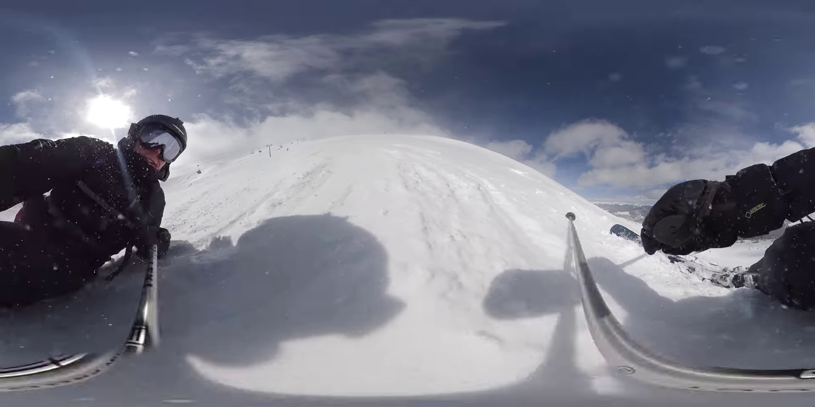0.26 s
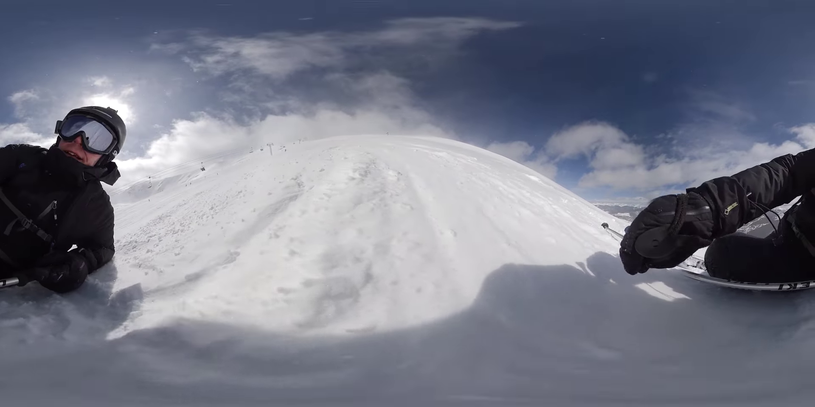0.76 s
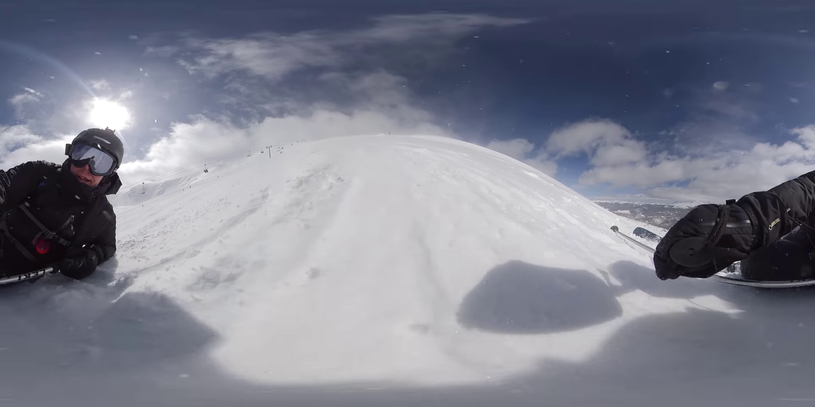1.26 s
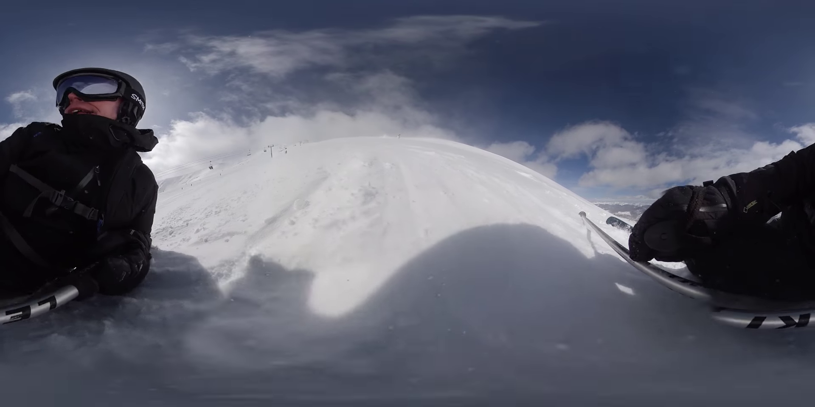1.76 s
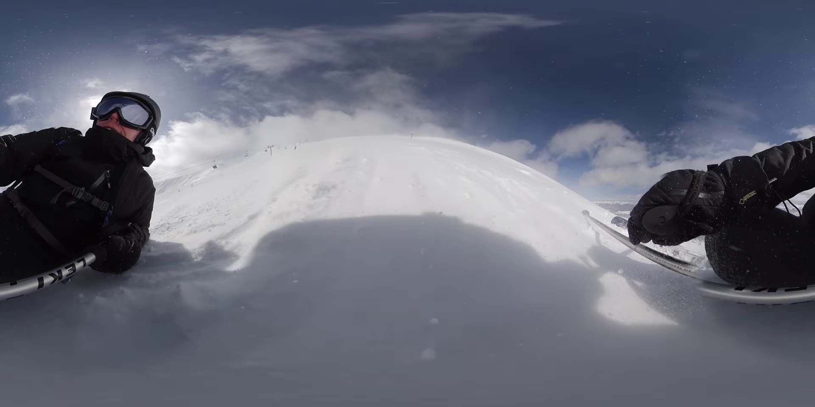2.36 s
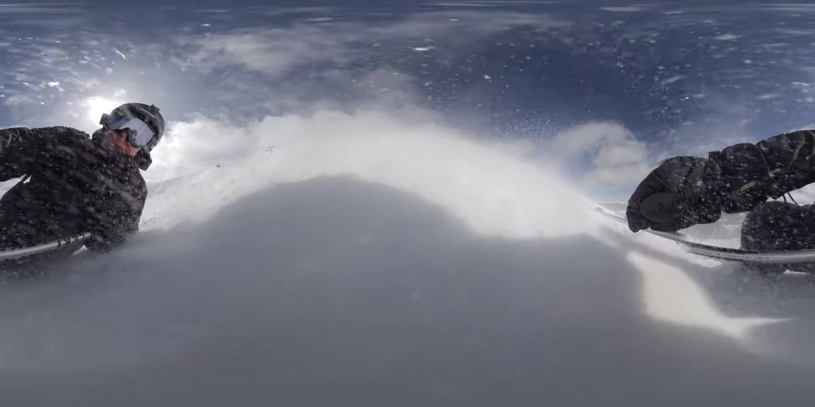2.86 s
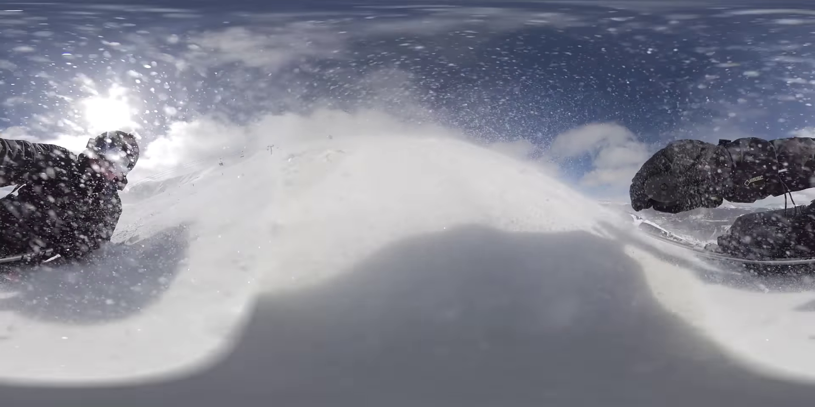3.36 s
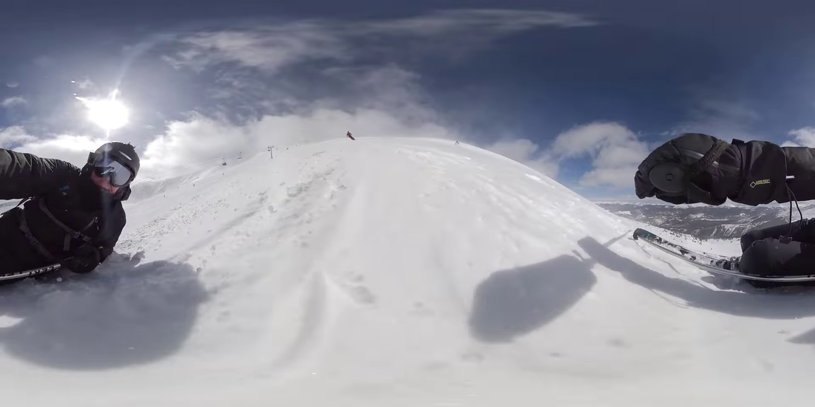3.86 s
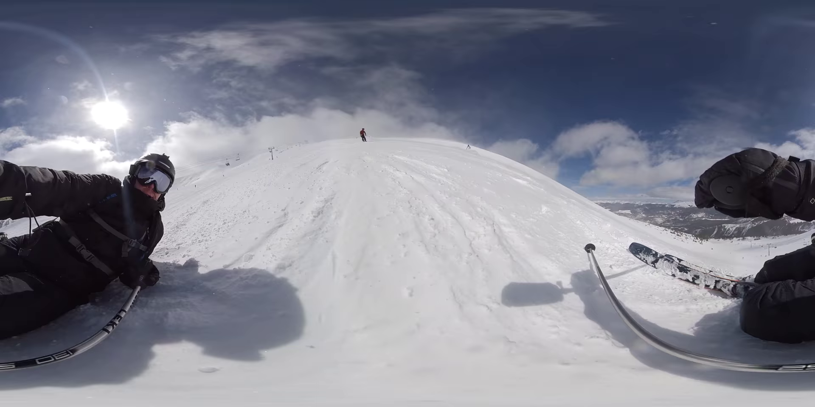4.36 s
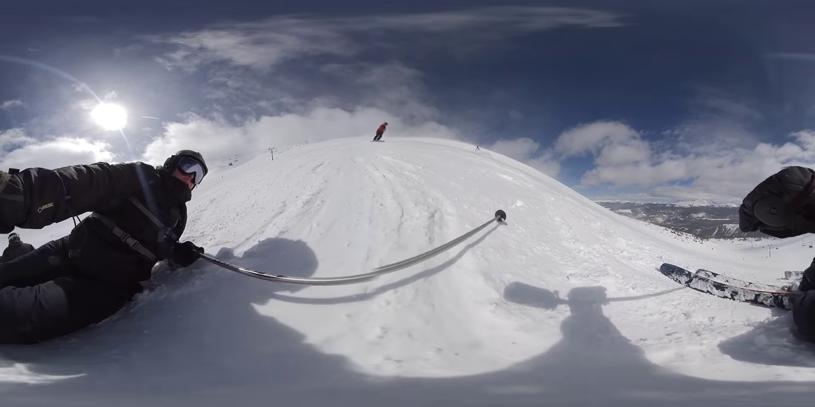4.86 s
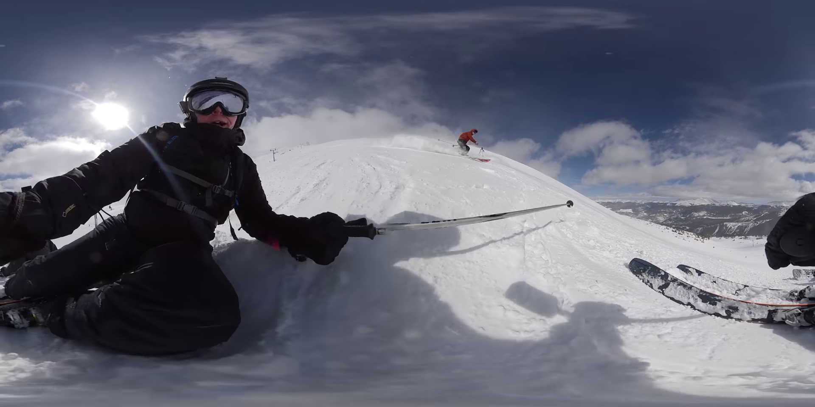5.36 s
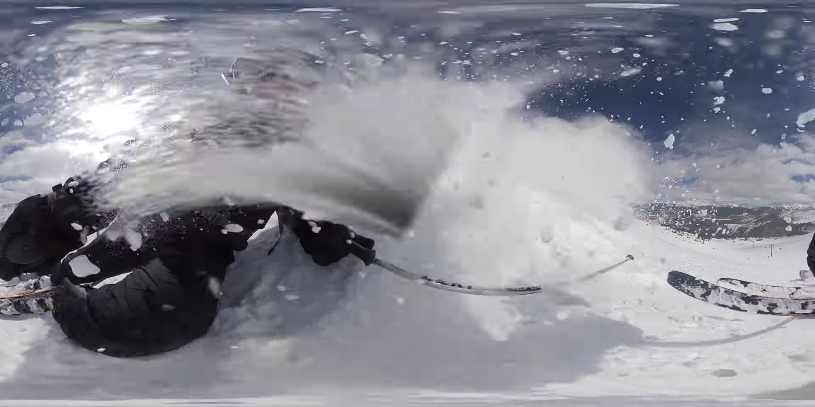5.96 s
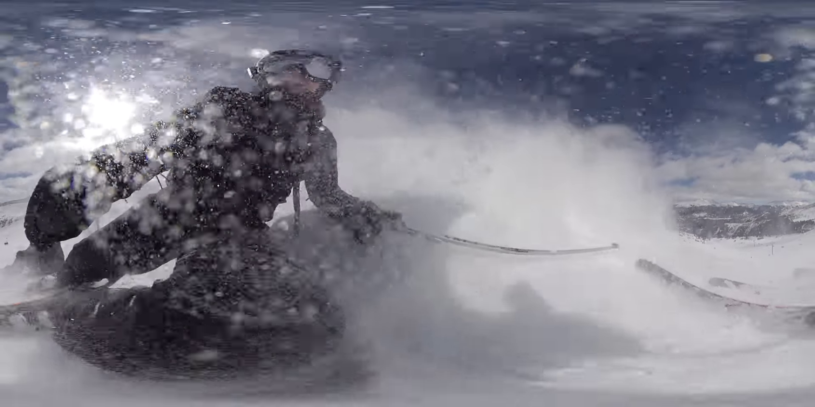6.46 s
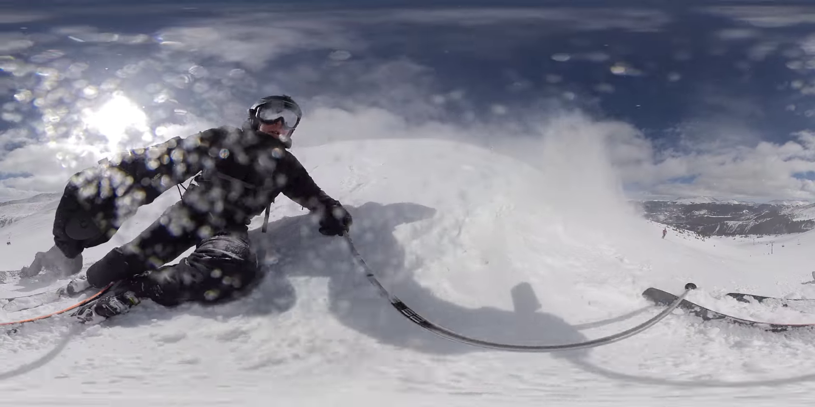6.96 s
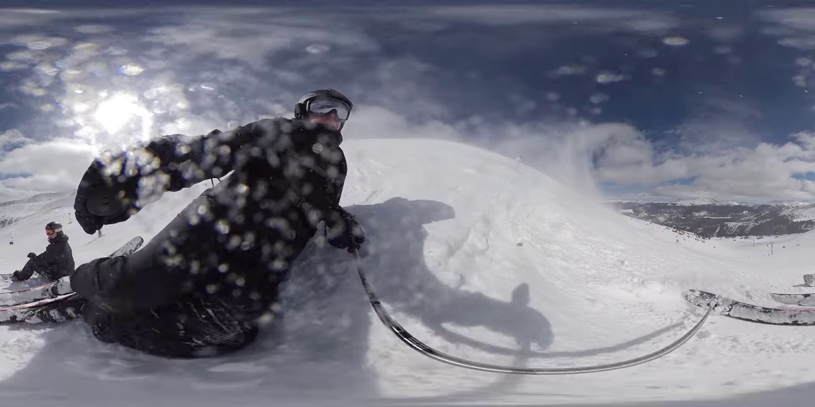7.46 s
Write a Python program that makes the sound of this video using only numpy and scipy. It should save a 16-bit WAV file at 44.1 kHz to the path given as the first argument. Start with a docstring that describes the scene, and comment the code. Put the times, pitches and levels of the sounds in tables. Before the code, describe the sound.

On an open slope without echo, a microphone held low on a pole picks up the soft hiss of skis and light wind. Sharp taps and brief rubs come from the mount. Toward the middle, spraying snow swells loudly and clumps crunch against the housing. After a quiet stretch of gliding, more hard knocks land, followed by a short spatter of powder and a few last taps.

```python
"""A faint hiss of skis gliding in deep powder, heard from a camera held low on a pole, close to the snow.
A little wind rumbles on the two microphone ports. As the skier carves, spray rushes past and pelts
the housing, and clumps of snow burst on it and make the ports hoot. The mount rubs and knocks as the
pole swings, and late in the run the pole hums briefly. Open slope, no echo."""
import sys
import numpy as np
from scipy import signal
from scipy.fft import rfft, irfft, next_fast_len
from scipy.io import wavfile
from scipy.ndimage import uniform_filter1d, minimum_filter1d

SR = 44100
rng = np.random.default_rng(int(sys.argv[2]) if len(sys.argv) > 2 else 0)


def store_pcm(level_fs):
    """Save levels as 16-bit WAV."""
    pcm = np.round(np.clip(level_fs, -1, 1) * 32767).astype(np.int16)
    wavfile.write(sys.argv[1], SR, np.atleast_2d(pcm).T)


N = 339614
CUTOFF_HZ = 9900  # top of the microphones' range
CAVITY_HZ, CAVITY_WIDTH_HZ = 1074, 190  # hollow behind each port
POLE_HZ = 137.4

# Levels in the tables are relative: each source adds its own gain.
# rush of spray along the run: t/s, middle level/dB, treble level/dB
SPRAY_LEVELS = [(0.0, -52.5, -47.5), (0.3, -53.5, -52.5), (0.71, -52, -54.5), (1.03, -49, -54.5),
                (1.48, -45.5, -41.5), (1.67, -39, -45.5), (2.04, -52, -49), (2.32, -42, -43.5),
                (2.68, -26.5, -26), (2.96, -32.5, -25), (3.43, -29.5, -29.5), (3.71, -50.5, -47),
                (3.86, -60.5, -60.5), (4.44, -53, -60), (4.95, -62, -60.5), (5.47, -47, -49),
                (5.62, -39.5, -51), (5.98, -46.5, -55.5), (6.22, -42.5, -45), (6.52, -56, -55),
                (6.8, -57, -61.5), (7.06, -65.5, -58.5), (7.25, -45, -53.5), (7.7, -50, -52.5)]
# showers of loose powder that reach the camera: t/s, level/dB, hold/s
POWDER_SHOWERS = [(0.0, -44, 0.0075), (.71, -46, 0.021), (2.07, -45.5, 0.0082), (2.39, -31, 0.0067),
                  (2.51, -23, 0.12), (2.745, -20.5, 0.024), (2.935, -22, 0.13), (3.5, -26.5, 0.059),
                  (6.26, -31.5, 0.039), (6.38, -41, 0.036), (7.57, -46, 0.041)]
# ski edges scraping on firmer snow: t/s, level/dB, hold/s
EDGE_SCRAPES = [(.53, -34, .05), (4.58, -46, .09), (5.45, -41, .11), (7.07, -39, .11)]
# spray as heard at the ports: f/Hz, left level/dB, right level/dB
SPRAY_SPECTRUM = [(150, -32.5, -17), (414, -15.5, -28), (781, -8.5, 3.5), (1060, -10.5, 9), (1310, -3, 0),
                  (1440, -11, 6), (1950, -4, -2), (2127, -6, 6), (2840, -9.5, 1), (3290, -18.5, -3),
                  (4710, -15.5, -11.5), (5790, -21.5, -18.5), (7570, -22.5, -9.5), (10400, -23.5, -18.5)]
# how hard the skis press the powder down: t/s, level/dB
SKI_PRESSURE = [(0.0, -71.5), (0.73, -52.5), (1.03, -63.5), (1.67, -55.5), (2.12, -62), (2.81, -54.5),
                (3.39, -59), (3.62, -61.5), (5.0, -61), (5.68, -52), (6.69, -67), (7.7, -57.5)]
# powder giving way under the skis: f/Hz, level/dB
GLIDE_SPECTRUM = [(50, -21.5), (140, -11), (260, -5.5), (450, -4.5), (700, 1), (1050, 1), (1500, -9.5),
                  (2400, -20), (4000, -41.5), (9000, -39.5)]
# air flow over the ports: t/s, level/dB
AIR_FLOW = [(0.0, -68), (0.41, -60.5), (0.62, -51), (1.14, -65), (1.74, -47.5), (2.06, -61.5),
            (2.42, -47.5), (4.14, -67), (6.69, -80), (7.7, -67)]
# rumble of that flow: f/Hz, level/dB
WIND_SPECTRUM = [(20, -6), (52, 6.5), (80, 4), (140, -4), (250, -10), (450, -16), (900, -32), (2500, -62)]
# low thuds of hard knocks on the housing, with softer puffs of wind: t/s, level/dB, hold/s
THUDS_AND_PUFFS = [(.135, -48, 0.011), (.56, -43, 0.094), (.66, -33, 0.0063), (.742, -33, 0.027),
                   (1.661, -20, 0.0075), (1.71, -48, 0.048), (4.405, -48, .01), (5.295, -48, 0.014),
                   (5.46, -47.5, .015), (5.76, -50, .02), (6.016, -24, 0.0023), (6.097, -29.5, .003),
                   (6.97, -48, 0.021), (7.285, -48.5, 0.035), (7.655, -52, .01)]
# dull tone of a thud or puff: f/Hz, level/dB
THUD_SPECTRUM = [(25, 8.0), (60, 0.0), (160, 1.5), (350, -5.0), (700, -10.0), (2000, -29.0)]
# the mount rubbing as the pole swings: t/s, level/dB, hold/s
MOUNT_RUBS = [(.593, -24, .002), (.605, -17.5, 0.0067), (1.326, -21.5, .002), (1.339, -16.5, .011),
              (1.366, -23, 0.0067), (1.728, -14, 0.0054), (5.634, -14.5, 0.0049), (5.659, -19.5, 0.0029),
              (7.098, -14.5, 0.0065)]
# the housing rung by a rub: f/Hz, left level/dB, right level/dB
RUB_SPECTRUM = [(147, -61, -49), (393, -25.5, -51), (703, -8.5, -6.5), (1018, -3, 6), (1296, -5.5, -15),
                (1620, 4, 0.5), (1770, -24, 4), (2244, 3.5, 1.5), (2750, -23, 9), (3440, -7, -4),
                (4900, -20, -10), (6560, -29, -30.5), (7470, -27, -9), (9300, -22, -17)]
# knocks and taps on the housing: t/s, level/dB, thump/dB, hardness/dB, left minus right/dB
HOUSING_KNOCKS = [(0.606, -14, 3, 12, -9), (.695, -34, 10, 20, -4), (.986, -38, -5, 14, -8),
                  (1.013, -38.5, -5, 12, -2), (1.3395, -17.5, -21, 10, -6.5), (1.3613, -20.5, -18, 4, 0),
                  (1.6601, -8, -1, 3, -7), (1.6665, -12, 12, 4.5, -0.5), (1.6814, -21, 2, 18, -9),
                  (1.696, -18.5, -2, 32, -20), (1.7075, -13, 1, 8, -12), (1.7154, -19.5, 10, 13, -3),
                  (1.7266, -8, -14, 27, -13), (1.7326, -6.5, -2, 16, -15), (1.7721, -10.5, -7, 10, -10.5),
                  (1.851, -28, -30, -2, -4), (2.2653, -18, -6, 10.5, -4.5), (3.1252, -23, -15, 0, 11),
                  (3.3574, -16, -28, -4, 8), (3.371, -2, -25, -0.5, 10), (4.087, -32.5, -17, 4, -1),
                  (4.3624, -32.5, -8, -3, -22), (4.4088, -32, -9, 5, -6.5), (4.4577, -36.5, -12, 0, -5),
                  (4.677, -40.5, -12, 11, -5), (5.6393, -2, -12, 8.5, -19), (5.724, -33, 7, 32, -19),
                  (5.985, -32.5, -6, 3, -12), (6.016, -3, -15, -3, -1), (6.0452, -31, -6, 29, -2),
                  (6.065, -14.5, -26, 0, -7), (6.0963, -8.5, -9.5, -2.5, -6), (6.1065, -32, -10, 19, -5),
                  (6.2552, -22.5, 2, 8, -5.5), (6.3267, -25.5, -10, 5, -2), (6.758, -37, 10, -8, -15),
                  (7.085, -18.5, 1, 4, -16), (7.108, -12, -19, 8, -13), (7.132, -22.5, -10, -4.5, -13)]
# the housing rung by a knock: f/Hz, left level/dB, right level/dB
KNOCK_SPECTRUM = [(159, -4, -29), (390, -4.5, -8.5), (744, -24.5, -10), (954, -1.5, -7), (1170, -6.5, -4.5),
                  (1400, 0.5, -6), (1853, -2, -5), (2100, -7, 1), (2840, -11, 0.5), (3470, -14, -6),
                  (5050, -2, -8), (6200, -20.5, -7), (7380, -24, -4), (9700, -11.5, -6)]
# clumps of snow bursting on the housing: t/s, level/dB, hold/s
SNOW_CLUMPS = [(.748, -37.5, .015), (1.66, -13.5, 0.0059), (3.129, -8, 0.014), (3.165, -10.5, 0.027),
               (3.358, -13, 0.015), (3.407, -8, 0.049), (3.487, -13, 0.041), (3.535, -9, 0.023),
               (6.076, -32.5, 0.0075), (6.246, -26, 0.0071)]
# snow crumbling right on the ports: f/Hz, left level/dB, right level/dB
CLUMP_SPECTRUM = [(150, -39, -33), (405, -22.5, -24.5), (750, -16.5, -12.5), (970, -7, -11),
                  (1256, -8.5, -12), (1580, -5.5, -23), (1830, -11.5, -8), (2350, -8, -19.5),
                  (2650, -20, -4), (3430, -17, -22.5), (5100, -19, -17.5), (6320, -43, -38.5),
                  (7380, -32, -10.5), (9300, -20, -19.5)]
# the pole shuddering after hard blows: t/s, level/dB, hold/s
POLE_SHUDDER = [(6.14, -55.5, 0.11)]
# how alike the two ports sound: f/Hz, left-right correlation
PORT_LIKENESS = [(100, 1), (400, 0.54), (1000, 0.54), (2500, 0.055), (5000, 0.14), (8000, 0.48)]


def from_db(db):
    """Decibels to gain."""
    return np.exp(np.asarray(db) * np.log(10) / 20)


def rms_one(x):
    """Scale to unit rms."""
    return x / np.sqrt(np.mean(x ** 2) + 1e-20)


def in_time(rows):
    """Each column of a curve at every sample."""
    times, *columns = np.transpose(rows)
    return [np.interp(np.arange(N) / SR, times, column) for column in columns]


def at_hz(points, hz):
    """Each column of a spectrum at the given frequencies."""
    known_hz, *columns = np.transpose(points)
    return np.array([np.interp(np.log(hz + 1), np.log(known_hz), column) for column in columns])


def drift(rate_hz):
    """Smooth random wander of unit rms."""
    step, settle = 40, 2000  # samples per step, steps for the filter to settle
    r = np.exp(-2 * np.pi * rate_hz * step / SR)
    noise = rng.standard_normal(N // step + settle + 2)
    slow = signal.lfilter([1], [1, -2 * r, r * r], noise)[settle:]
    return np.interp(np.arange(N) / step, np.arange(len(slow)), rms_one(slow))


def pushes(rows, attack_s, release_s, softness=0.0):
    """Envelope of pushes that build, hold and die; softness adds a share of the hold to both edges."""
    t, power = np.arange(N) / SR, np.zeros(N)
    for start_s, db, hold_s in rows:
        rise, fall = attack_s + softness * hold_s, release_s + softness * hold_s
        end_s = start_s + hold_s
        near = slice(max(int((start_s - 8 * rise) * SR), 0), int((end_s + 8 * fall) * SR))
        away = np.maximum((start_s - t[near]) / rise, (t[near] - end_s) / fall)
        power[near] += (from_db(db) * np.exp(-np.maximum(away, 0))) ** 2
    return np.sqrt(power)


def grains(per_s, spread_db):
    """Random tiny impacts of uneven size at each port; rms 1 whatever their rate."""
    hits = rng.random((2, N)) < per_s / SR
    size = rng.exponential(1, (2, N))[hits]
    sign = np.sign(rng.random((2, N))[hits] - .5)
    clicks = np.zeros((2, N))
    clicks[hits] = sign * from_db(spread_db * np.minimum(size, 4))
    return rms_one(clicks / np.sqrt(per_s))


def coloured(x, spectrum, size=2048):
    """Pass through a causal (minimum-phase) body with this spectrum."""
    gains = from_db(at_hz(spectrum, np.fft.rfftfreq(size, 1 / SR)))
    cepstrum = irfft(np.log(gains))
    cepstrum[:, 1:size // 2] *= 2
    cepstrum[:, size // 2 + 1:] = 0
    response = irfft(np.exp(rfft(cepstrum)))
    return signal.oaconvolve(x, response, axes=-1)[:, :x.shape[-1]]


def top_cut(x):
    """Steep low-pass at the top of the microphones' range."""
    return signal.sosfilt(signal.ellip(12, .2, 85, CUTOFF_HZ, fs=SR, output="sos"), x)


def at_ports(pair, lag_s=0.0, housing_hz=5500):
    """Two unrelated signals become stereo; the left lags, except in the treble the housing carries."""
    size = next_fast_len(pair.shape[-1], real=True)
    hz = np.fft.rfftfreq(size, 1 / SR)
    alike = np.clip(at_hz(PORT_LIKENESS, hz)[0], -.98, .98)
    mid, side = rfft(pair, size) * np.sqrt([1 + alike, 1 - alike])
    delay = np.exp(-2j * np.pi * np.minimum(hz, housing_hz) * lag_s)
    left, right = (mid + side) * delay, mid - side
    return irfft(np.array([left, right]), size)[:, :pair.shape[-1]]


def panned(pair, pan_db):
    """Unit-rms stereo with the given left minus right level."""
    gains = from_db([[pan_db / 2], [-pan_db / 2]])
    return np.array([rms_one(channel) for channel in pair]) * rms_one(gains)


def patchy(x, depth_db, bands=6):
    """Each region of the spectrum flickers by itself as the snow scatters unevenly."""
    size = next_fast_len(N, real=True)
    hz = np.fft.rfftfreq(size, 1 / SR)
    place = np.interp(np.log(hz + 1), np.log([900, 9000]), [0, bands - 1])
    spectrum, out = rfft(x, size), 0
    for band in range(bands):
        share = np.maximum(1 - abs(place - band), 0)
        out = out + irfft(spectrum * share, size)[:, :N] * from_db(depth_db * drift(25))
    return out


def spray(middle_db=1.5, treble_db=3.0, shower_treble_db=4.0, pellet_db=-12.5,
          patchy_db=3.0, flutter_db=1.35, pan_db=-7.0, split_hz=4700):
    """Ski hiss, right of centre, with crystals and odd pellets hitting the housing faster as it grows."""
    middle_run_db, treble_run_db = in_time(SPRAY_LEVELS)
    shower = pushes(POWDER_SHOWERS, attack_s=0.021, release_s=0.053) / np.sqrt(2)
    scrape = pushes(EDGE_SCRAPES, attack_s=0.026, release_s=0.05)
    middle_gain = np.sqrt(from_db(middle_db + middle_run_db) ** 2 + shower ** 2 + scrape ** 2)
    # fine dry powder on the housing is bright, the skis alone are duller
    treble_gain = np.hypot(from_db(treble_db + treble_run_db), from_db(shower_treble_db) * shower)
    thickness = np.sqrt(np.hypot(middle_gain, treble_gain) / from_db(-33))
    crystals = grains(per_s=4000 * thickness, spread_db=3.5)
    pellets = from_db(pellet_db) * grains(per_s=90 * thickness, spread_db=1.3)
    hiss = rng.standard_normal((2, N))
    # thick spray scatters unevenly, a thin glide stays smooth
    uneven = np.minimum(np.sqrt(thickness), 1)
    snow = patchy(hiss + crystals + pellets, patchy_db * uneven)
    snow = top_cut(coloured(at_ports(snow, lag_s=0.000376), SPRAY_SPECTRUM))
    middle = signal.sosfilt(signal.butter(4, split_hz, fs=SR, output="sos"), snow)
    treble = signal.sosfilt(signal.butter(4, split_hz, "high", fs=SR, output="sos"), snow)
    rush = panned(middle, pan_db) * middle_gain + panned(treble, pan_db) * treble_gain
    return rush * from_db(flutter_db * uneven * drift(45))


def glide(level_db=4.0, uneven_db=5.5):
    """The dull, hollow rush of the skis pressing the powder down, close to the microphones."""
    pressure_db, = in_time(SKI_PRESSURE)
    noise = at_ports(rng.standard_normal((2, N)), lag_s=0.00041)
    rush = rms_one(coloured(noise, GLIDE_SPECTRUM))
    return rush * from_db(level_db + pressure_db + uneven_db * drift(25))


def wind_and_thuds(level_db=3.5, lumpy_db=5.0):
    """Lumpy low turbulence and soft puffs on the ports, with low thuds of hard knocks on the housing."""
    flow_db, = in_time(AIR_FLOW)
    rumble = rms_one(coloured(at_ports(rng.standard_normal((2, N))), WIND_SPECTRUM, size=8192))
    rumble *= from_db(level_db + flow_db + lumpy_db * drift(21))
    thuds = rms_one(coloured(at_ports(rng.standard_normal((2, N))), THUD_SPECTRUM))
    thuds *= pushes(THUDS_AND_PUFFS, attack_s=0.00084, release_s=0.0034, softness=0.21)
    return (rumble + thuds) * from_db([[.8], [-.8]])  # slightly to the left


def mount_rubs():
    """The mount sticks and slips in quick uneven jerks that ring the housing."""
    slips = at_ports(grains(per_s=3000, spread_db=3.5), lag_s=0.00037)
    ringing = rms_one(top_cut(coloured(slips, RUB_SPECTRUM)))
    return ringing * pushes(MOUNT_RUBS, attack_s=0.0014, release_s=0.0033, softness=0.7)


def port_hoot(x):
    """The cavity of a microphone port rings at one resonance, with gain 1 at its peak."""
    r = np.exp(-np.pi * CAVITY_WIDTH_HZ / SR)
    feedback = [1, -2 * r * np.cos(2 * np.pi * CAVITY_HZ / SR), r * r]
    return signal.lfilter(np.array([1, 0, -1]) * (1 - r * r) / 2, feedback, x)


def housing_knocks(press_s=0.00064, press_db=-10.0, crunch_s=0.0022, crunch_db=5.5,
                   tail_s=0.0019, tail_db=-19.0, blow_s=0.0053, tick_db=-8.5):
    """Each blow on the housing presses in, clicks and crunches, coloured by where and how hard it lands."""
    size, lead = 2048, 256  # samples in a blow, samples ahead of its click
    out = np.zeros((2, N + size))
    t = (np.arange(size) - lead) / SR
    press = from_db(press_db) * np.exp(-abs(t) / press_s)
    crunch = from_db(crunch_db) * np.exp(-abs(t) / crunch_s)
    tail = from_db(tail_db) * np.exp(-abs(t) / tail_s)
    envelope = np.where(t < 0, press, crunch + tail)
    hz = np.geomspace(300, 10000, 26)
    for time_s, db, thump_db, hard_db, pan_db in HOUSING_KNOCKS:
        force = envelope * at_ports(rng.standard_normal((2, size)))
        force[:, lead] += 1  # the click
        force += from_db(-max(hard_db, 0)) * port_hoot(force)  # soft blows hoot most
        contact = [(300, thump_db), (750, 0), (1500, 0),
                   (2300, hard_db), (3800, hard_db), (6000, hard_db + tick_db)]
        # each spot on the housing favours some resonances over others
        spot_db = at_hz(contact, hz)[0] + rng.normal(0, 2, len(hz))
        struck = coloured(force, np.column_stack([hz, spot_db]))
        blow = top_cut(coloured(struck, KNOCK_SPECTRUM))
        # the level is that of the first few milliseconds, which hold the energy
        gain = from_db(db) * np.sqrt(blow_s * SR / size)
        start = int(time_s * SR) - lead
        out[:, start:start + size] += gain * panned(blow, pan_db)
    return out[:, :N]


def snow_clumps(hoot_db=3.0, flicker_db=-1.0):
    """Packed snow crumbles right over the ports and makes their cavities hoot."""
    crumbs = grains(per_s=7000, spread_db=-2.0)
    hoot = from_db(hoot_db) * port_hoot(crumbs.sum(axis=0))
    crumble = rms_one(top_cut(coloured(crumbs + hoot, CLUMP_SPECTRUM)))
    bursts = pushes(SNOW_CLUMPS, attack_s=.001, release_s=0.006, softness=0.17)
    return crumble * bursts * from_db(flicker_db * drift(110))


def pole_hum():
    """A bending mode of the pole hums briefly under the camera."""
    mode = np.sqrt(2) * np.sin(2 * np.pi * POLE_HZ * np.arange(N) / SR)
    return mode * pushes(POLE_SHUDDER, attack_s=.02, release_s=0.041)


def scene():
    """Everything is close to the microphones, and the snow gives no echo."""
    return (spray() + glide() + wind_and_thuds()
            + mount_rubs() + housing_knocks() + snow_clumps() + pole_hum())


def record(dry):
    """The loudest blows overload the microphones, a fast limiter holds the peaks, and the top is cut."""
    rounded = dry / (1 + dry ** 4) ** (1 / 4)
    safe_gain = np.minimum(.97 / (abs(top_cut(rounded)) + 1e-9), 1)
    limiter_gain = uniform_filter1d(minimum_filter1d(safe_gain, size=61), size=31)
    return top_cut(rounded * limiter_gain)


dry = scene()
out = record(dry)
store_pcm(out)
```